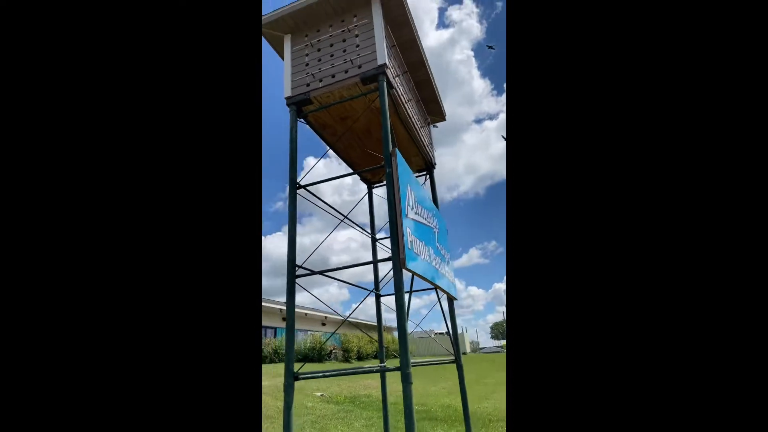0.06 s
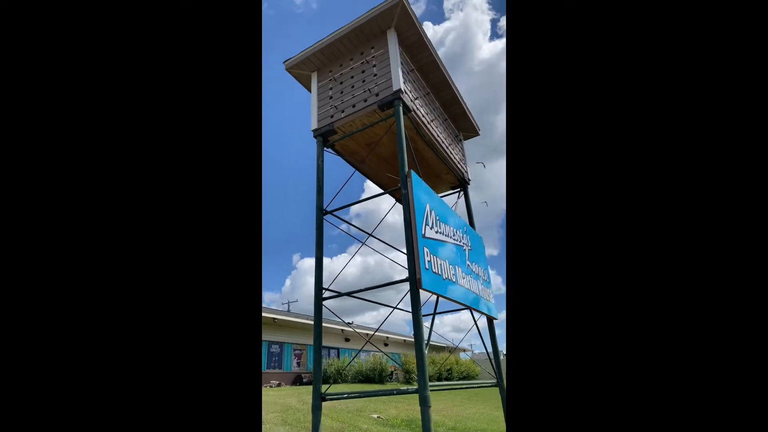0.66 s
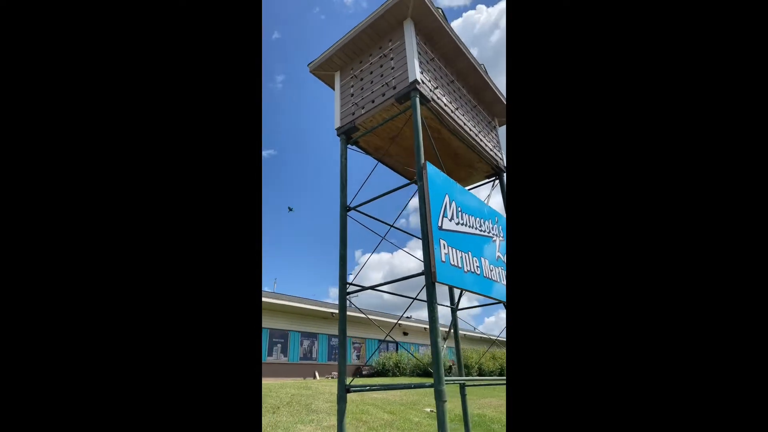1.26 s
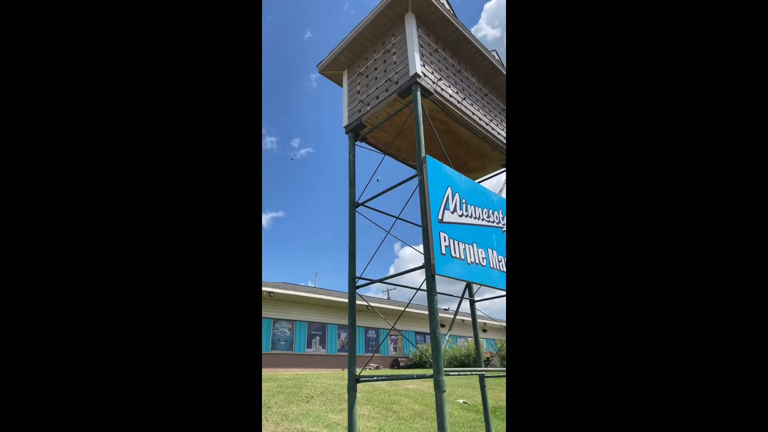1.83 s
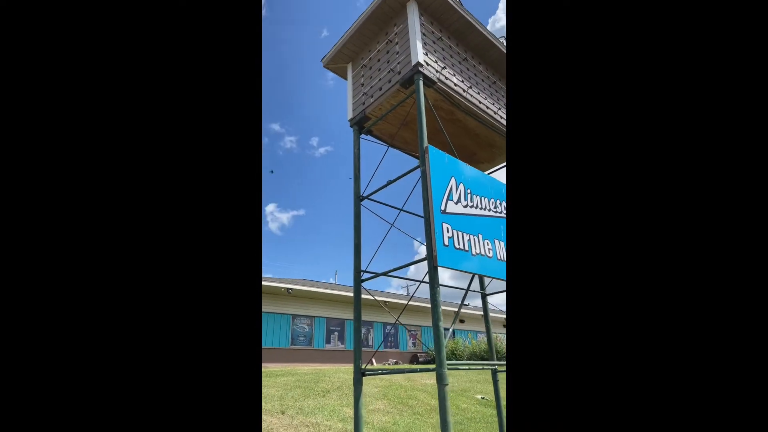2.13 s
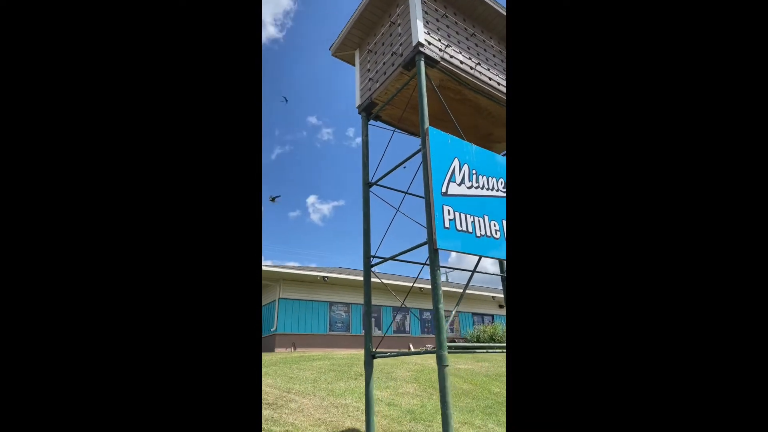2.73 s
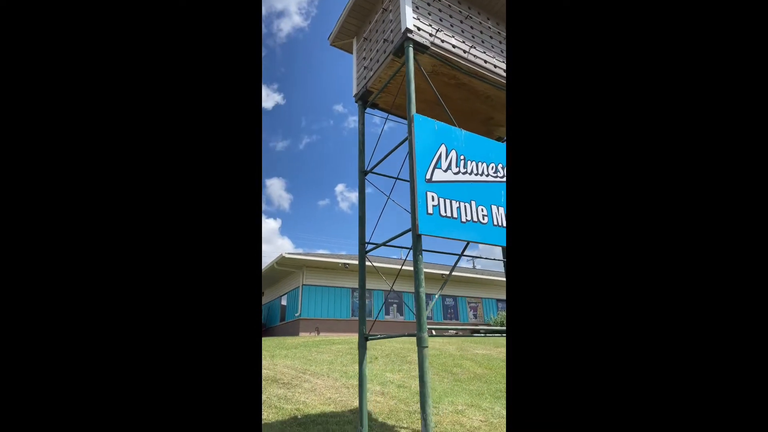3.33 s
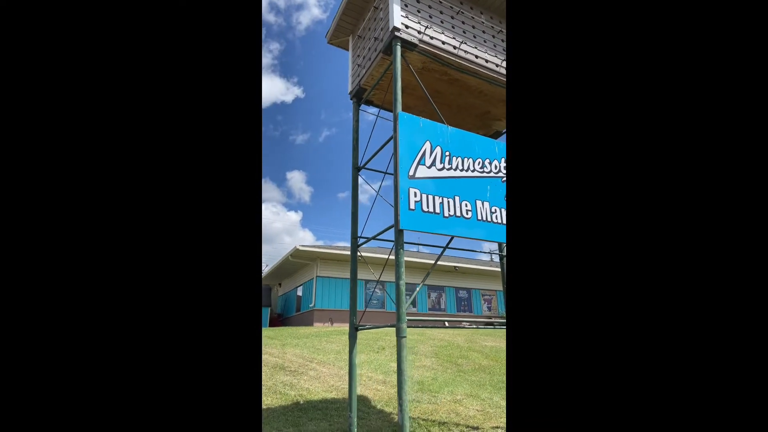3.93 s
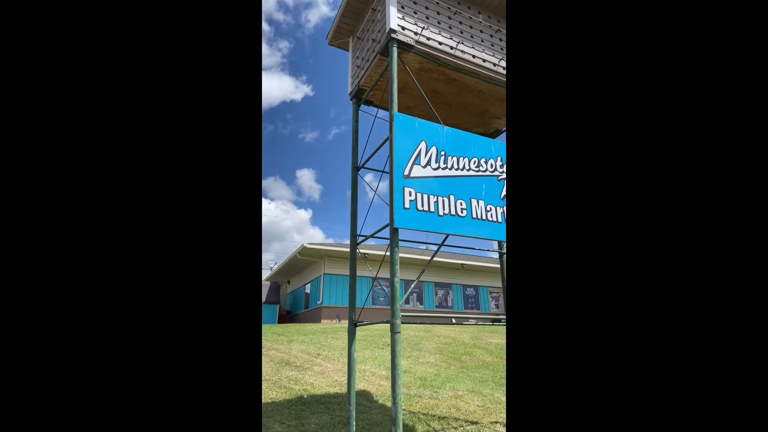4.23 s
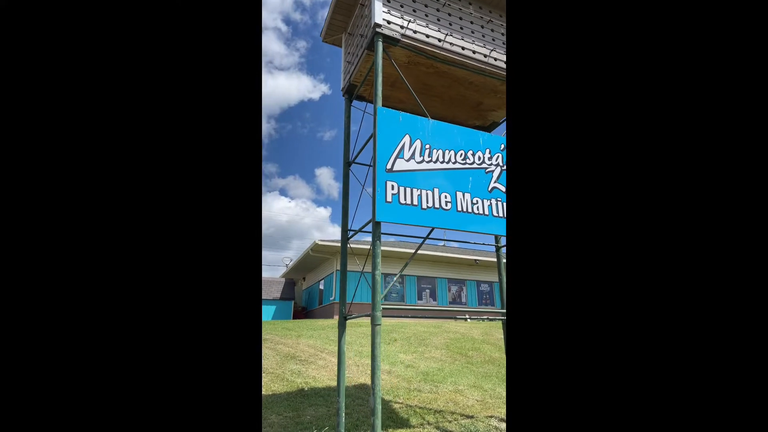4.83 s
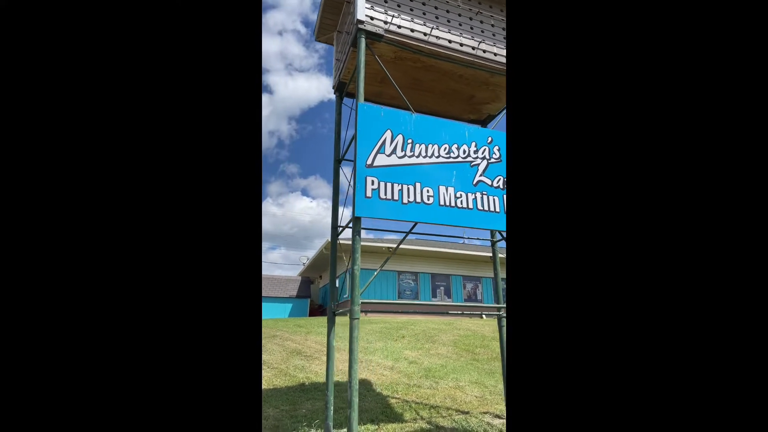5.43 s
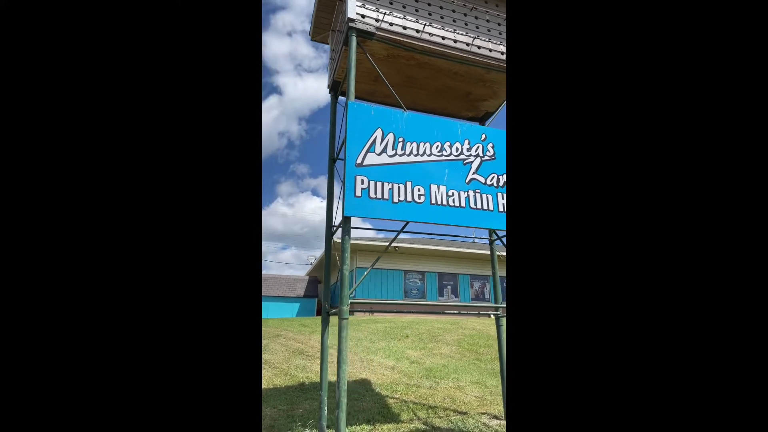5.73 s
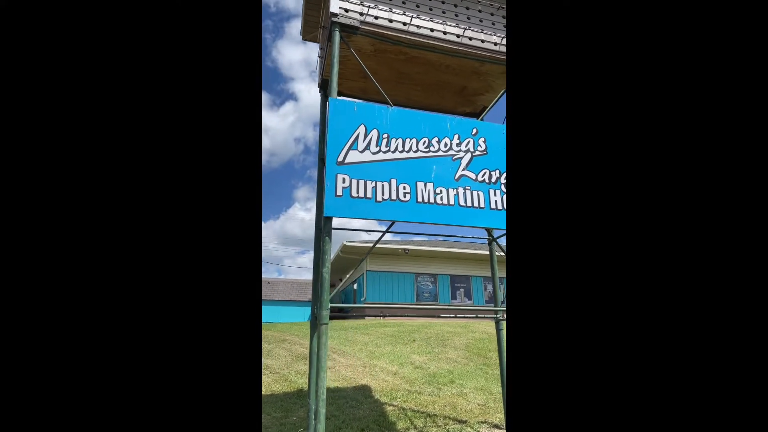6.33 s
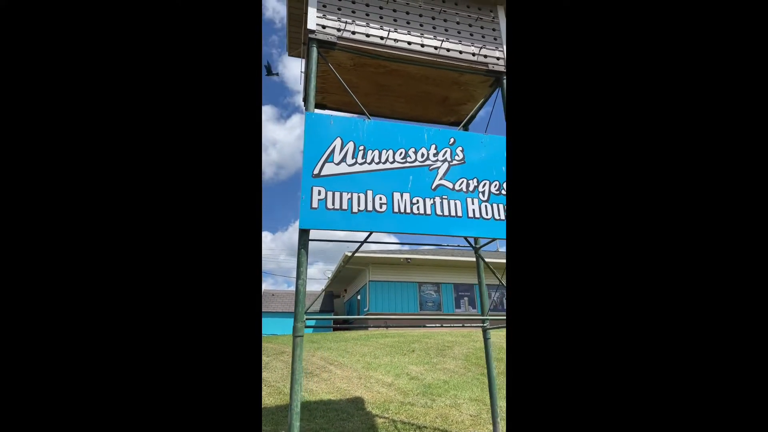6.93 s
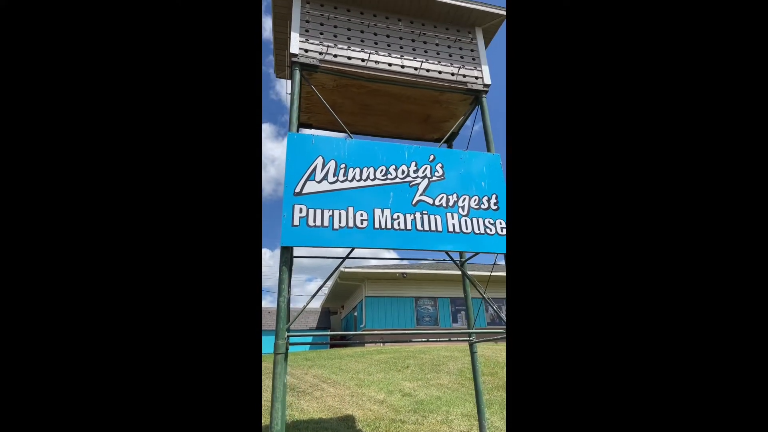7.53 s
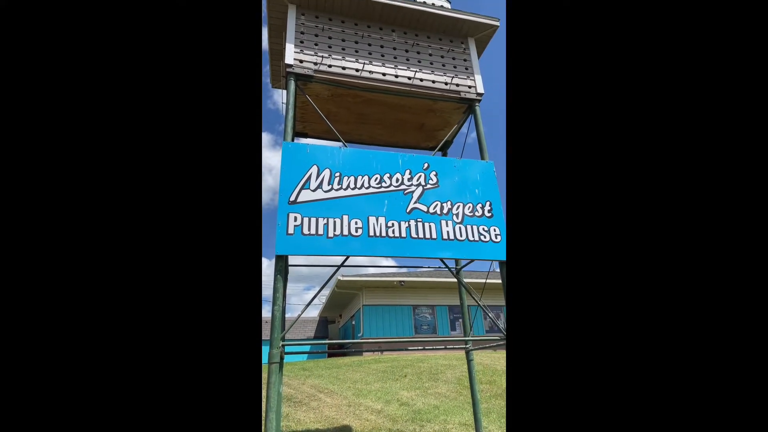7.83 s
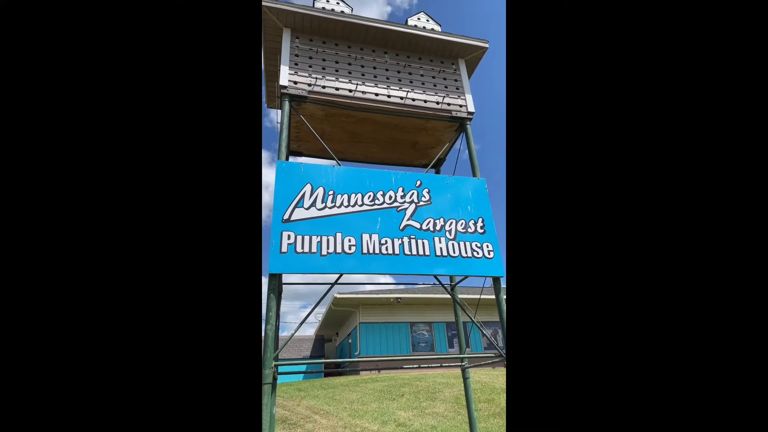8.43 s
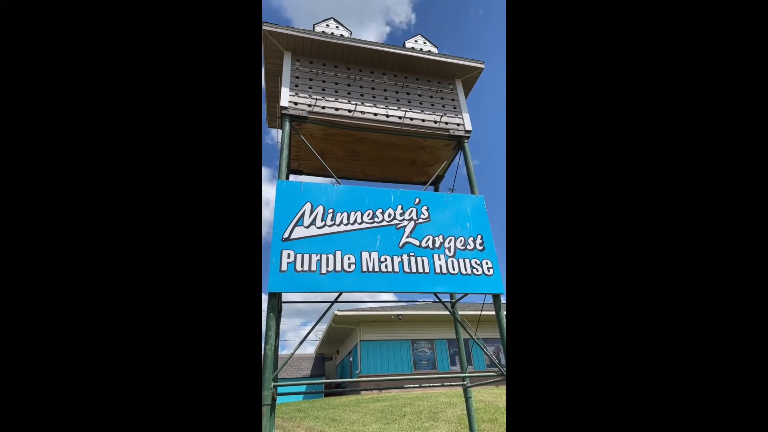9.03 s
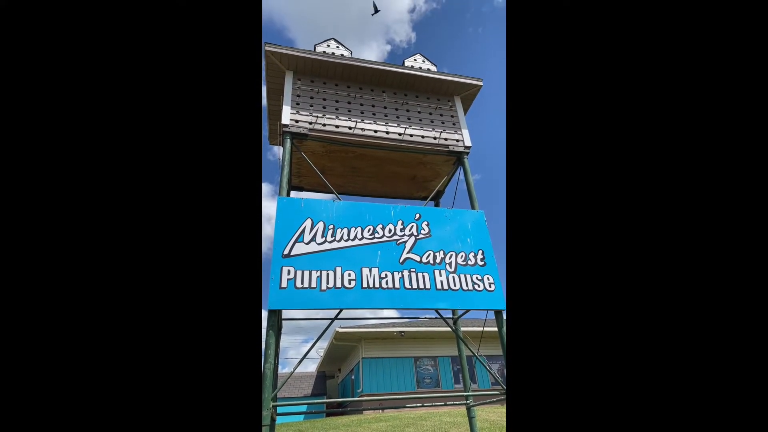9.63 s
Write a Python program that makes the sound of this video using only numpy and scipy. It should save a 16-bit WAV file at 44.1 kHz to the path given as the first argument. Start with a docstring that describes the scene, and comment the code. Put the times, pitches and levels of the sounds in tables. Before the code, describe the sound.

Purple martins chirp buzzy, down-slurred calls near and far over low traffic rumble, with wind gusts thumping the microphone later on.

```python
"""Purple martins around their colony house, near and far, throw down-slurred, buzzy "chew" calls,
each a sliding whistle with a fast trill. Near birds are fairly dry; far ones carry the yard's echo.
A car passes about nine metres off on the right and recedes, a heavy engine drones over a farther
road, and leaves hiss softly. Gusts thump on the hand-held stereo microphone, hardest near seven seconds."""
import sys
import numpy as np
from scipy import signal
from scipy.fft import rfft, irfft, next_fast_len
from scipy.io import wavfile
from scipy.ndimage import uniform_filter1d, map_coordinates

SR = 44100
rng = np.random.default_rng(int(sys.argv[2]) if len(sys.argv) > 2 else 0)


def unload_wav(signal):
    """Save mono or channel-first audio to the path in sys.argv[1] as 16-bit WAV at rate SR, clipped to [-1, 1]."""
    wavfile.write(
        sys.argv[1],
        SR,
        np.round(np.clip(np.atleast_2d(signal).T, -1, 1) * 32767).astype(np.int16),
    )


N = 426447

# Tyre roar from the road. Each row: frequency in Hz, relative level in dB.
TYRE_SPECTRUM = [(180, -11), (300, -19), (420, -13.5), (560, -5.5), (740, -0.5), (950, -0.5), (1120, -1.5),
                 (1480, -4), (2080, -11), (2800, -17.5), (3600, -26), (6000, -65)]
# Wind buffeting the microphone. Each row: frequency in Hz, relative level in dB.
BUFFET_SPECTRUM = [(24, -35), (40, -5), (70, 6.5), (120, -3.5), (200, -10.5), (320, -28), (700, -29),
                   (2000, -76)]
# The colour of a martin's overtones. Each row: frequency in Hz, gain in dB.
BEAK_RESPONSE = [(2600, 3), (3600, -16), (5200, 1.5), (6200, -1), (7400, 0), (8500, 1), (10700, -4),
                 (13000, -8)]


def amp(db):
    """Decibels to gain."""
    return 10 ** (np.asarray(db) / 20)


def unit(x):
    """Scale to rms 1."""
    return x / np.sqrt(np.mean(x ** 2) + 1e-20)


def along(points, hz):
    """Interpolate (Hz, value) points on a log frequency axis."""
    f, v = np.transpose(points)
    return np.interp(np.log(hz + 1), np.log(f + 1), v)


def curves(rows):
    """One value per sample for each column after the time."""
    s, *cols = np.transpose(rows)
    return [np.interp(np.arange(N) / SR, s, c) for c in cols]


def wobble(rate, size=N):
    """A smooth random curve, rate knots a second."""
    knots = rng.standard_normal(int(size * rate / SR) + 4)
    return map_coordinates(knots, [np.arange(size) * rate / SR])


def cycles(hz):
    """Running phase of a moving frequency, in radians."""
    return 2 * np.pi * (np.cumsum(hz) / SR + rng.random())


def filtered(x, response):
    """Filter x by a gain given as a function of frequency."""
    m = next_fast_len(N + SR // 4)
    return irfft(rfft(x, m) * response(np.fft.rfftfreq(m, 1 / SR)), m)[..., :N]


def add(track, s, sound):
    """Mix a sound into a track at time s."""
    start = int(np.clip(s * SR, 0, N - 1))
    track[..., start:start + sound.shape[-1]] += sound[..., :N - start]


def swell(u, attack, release):
    """Rounded start and end over the progress u of a call."""
    onset = np.sin(np.pi / 2 * np.clip(u / attack, 0, 1))
    return onset * np.sin(np.pi / 2 * np.clip((1 - u) / release, 0, 1))


def held(s, hold_s, db, rise_db_per_s, fall_db_per_s):
    """Gain that rises to db at time s, holds and dies away."""
    t = np.arange(N) / SR - s
    return amp(db - rise_db_per_s * np.maximum(-t, 0) - fall_db_per_s * np.maximum(t - hold_s, 0))


def rush(spectrum, patchy_db):
    """Stereo noise of rms 1 with patches of random gain, near mono in the bass."""
    # How alike the two channels are. Each row: frequency in Hz, left-right correlation.
    likeness = [(60, 1), (130, 0.98), (270, 0.85), (580, 0.39), (1240, 0.43), (2640, 0.53), (5600, 0.36),
                (11000, -0.17)]
    bins = signal.stft(rng.standard_normal((2, N)), nperseg=512)[2]
    patches = uniform_filter1d(rng.standard_normal(bins.shape[1:]), size=4, axis=0)
    patches = uniform_filter1d(patches, size=22, axis=1)
    pair = signal.istft(bins * amp(patchy_db * unit(patches)), nperseg=512)[1][:, :N]

    def mid_side_gains(hz):
        turn = np.arccos(np.clip(along(likeness, hz), -1, 1)) / 2
        band = (hz < 2 * spectrum[-1][0]) * np.minimum(hz / spectrum[0][0], 1) ** 4
        return band * amp(along(spectrum, hz)) * np.array([np.cos(turn), np.sin(turn)])

    mid, side = filtered(pair, mid_side_gains)
    return unit(np.array([mid + side, mid - side]))


def drone(hz, db, waver_db=1.5, spread_rad=.031):
    """One slightly unsteady hum line, reaching the two microphone ports a little apart."""
    apart = spread_rad * wobble(2.1) * np.array([[1], [-1]])
    level = amp(db + waver_db * wobble(4))
    return np.sqrt(2) * level * np.sin(cycles(hz + .27 * wobble(3.02)) + apart)


def leaves(level_db=-46.5):
    """Leaves hiss softly in the breeze."""
    # Leaf hiss. Each row: frequency in Hz, relative level in dB.
    hiss_spectrum = [(900, -21), (2000, 12.5), (3000, 6), (4200, 4), (4900, -3), (6200, -3), (8000, -9.5),
                     (10700, -4), (12500, -15.5)]
    return amp(level_db) * rush(hiss_spectrum, patchy_db=2)


def far_road():
    """Rumble and tyre roar of traffic on a farther road."""
    # Traffic levels. Each row: time in seconds, then deep rumble, upper rumble and tyre roar in dB.
    levels = [(0, -30, -39, -46), (1.5, -33, -38, -38.5), (2.6, -28, -40.5, -41.5),
              (3.5, -35.5, -41.5, -43), (6.2, -32, -40, -39.5), (7.1, -43, -40.5, -42),
              (8, -43, -40, -41.5), (9.67, -42.5, -42, -43.5)]
    # The two bands of rumble. Each row: frequency in Hz, relative level in dB.
    deep_spectrum = [(15, -50), (28, -30), (40, -6.5), (52, -1), (80, 0), (110, -5.5), (150, -15),
                     (260, -31.5)]
    upper_spectrum = [(70, -14), (130, 0), (180, -1.5), (260, -5), (380, -12), (600, -11), (1200, -50)]
    deep_db, upper_db, roar_db = curves(levels)
    deep = amp(deep_db) * rush(deep_spectrum, patchy_db=1.5)
    upper = amp(upper_db) * rush(upper_spectrum, patchy_db=1.5)
    return deep + upper + amp(roar_db) * rush(TYRE_SPECTRUM, patchy_db=1.75)


def machine(hz=185):
    """A faint machine hum that comes through late."""
    # The hum's rise. Each row: time in seconds, level in dB.
    levels = [(5.6, -53), (6.3, -45.5)]
    return drone(hz, *curves(levels))


def heavy_engine(low_hz=60.94, high_hz=91.8, rise_hz_per_s=.45):
    """A heavy engine in the background hums on two lines, the low one creeping up in pitch."""
    # The engine's two lines. Each row: time in seconds, low hum in dB, high hum in dB.
    levels = [(0, -25, -33), (1.7, -29, -28.5), (3.2, -30.5, -43), (4.4, -32.5, -33.5), (5.6, -39.5, -33),
              (6.6, -52, -38), (7.3, -44, -48.5), (9.67, -52, -45.5)]
    low_db, high_db = curves(levels)
    return drone(low_hz + rise_hz_per_s * np.arange(N) / SR, low_db) + drone(high_hz, high_db)


def car(nearest_s=.353, nearest_m=9.45, speed_m_per_s=14, grass_db_per_m=.04):
    """A car passes on the right, fading with distance over the grass, its exhaust note dropping."""
    # Tyre hiss. Each row: frequency in Hz, relative level in dB.
    hiss_spectrum = [(900, -17), (2000, 9), (3200, 5), (4900, -0.5), (6200, 0), (8000, -6), (10700, -9),
                     (12500, -19)]
    roar_db, hiss_db, pan_db = -27.5, -39.5, -4.5
    exhaust_hz, sag_hz_per_s = 137.5, 3
    t = np.arange(N) / SR
    past_m = speed_m_per_s * (t - nearest_s)
    range_m = np.hypot(nearest_m, past_m)
    leaving = past_m / range_m
    gain = nearest_m / range_m * amp(-grass_db_per_m * (range_m - nearest_m))
    doppler = 1 / (1 + leaving * speed_m_per_s / 343)
    facing = (1 + leaving) / 2  # the exhaust points backwards, so it opens up once the car is past
    exhaust = facing * drone(doppler * (exhaust_hz - sag_hz_per_s * t), db=-30)
    roar = amp([[roar_db + pan_db / 2], [roar_db - pan_db / 2]]) * rush(TYRE_SPECTRUM, patchy_db=1)
    hiss = amp(hiss_db) * rush(hiss_spectrum, patchy_db=2)
    return gain * (exhaust + roar + hiss)


def crosswind(edge_hz=80, breeze_db=-55):
    """One slow side gust, over a light breeze, pushes the two microphone ports in opposite directions."""
    buffet = rush(BUFFET_SPECTRUM, patchy_db=5)[0]
    # the largest eddies cover both ports, so the deep bass drops out
    eddies = filtered(buffet, lambda hz: hz ** 2 / (hz ** 2 + edge_hz ** 2))
    gust = held(s=5.9, hold_s=.13, db=-31, rise_db_per_s=28, fall_db_per_s=28)
    return (amp(breeze_db) + gust) * unit(eddies) * np.array([[1], [-1]])


def gusts():
    """Gusts buffet the microphone, and their biggest eddies land as single thumps."""
    # Single eddies. Each row: moment of the peak in seconds, pitch in Hz, peak level in dB.
    eddies = [(6.736, 228, -18), (6.742, 85, -13.5), (6.782, 383, -18), (6.794, 110, -13),
              (6.842, 176, -16), (7.005, 217, -18), (7.112, 94, -17.5), (8.343, 177, -24),
              (9.496, 55.6, -21)]
    # Gusts. Each row: moment of full strength in seconds, hold in seconds, level in dB.
    blasts = [(6.656, .24, -23), (6.964, 0.058, -20), (8.196, .36, -40.5), (9.24, 0.41, -34)]
    thumps = np.zeros(N)
    for s, hz, db in eddies:
        turns = np.arange(-2 * SR / hz, 2 * SR / hz) * hz / SR
        add(thumps, s - 2 / hz, amp(db) * np.cos(2 * np.pi * turns) * np.exp(-2 * turns ** 2))
    strength = np.max([held(*blast, rise_db_per_s=190, fall_db_per_s=198) for blast in blasts], axis=0)
    return thumps + strength * rush(BUFFET_SPECTRUM, patchy_db=0)


def yard(x):
    """Buildings and trees scatter a short tail back to the microphone."""
    # The yard's decay. Each row: frequency in Hz, time to fall 60 dB in seconds.
    decay_times = [(500, 0.8), (3000, 0.2), (10000, 0.16)]
    hz, t, bins = signal.stft(rng.standard_normal((2, SR // 2)), SR, nperseg=256)
    tail = signal.istft(bins * amp(-60 * t / along(decay_times, hz)[:, None]), SR, nperseg=256)[1]
    return signal.fftconvolve(x, tail / np.linalg.norm(tail[0]), axes=1)[:, :N]


def bounced(voice, strength=.16, count=5):
    """The house and the ground throw back weak copies within milliseconds."""
    heard = np.zeros((2, voice.shape[1] + SR // 40))
    add(heard, 0, voice)
    for delay_s in rng.uniform(.002, .02, count):
        add(heard, delay_s, strength * voice)
    return heard


def rasps(rough_db=1.5):
    """Bouts of hoarse, toneless chatter in the distance."""
    # The bouts. Each row: start in seconds, length in seconds, level in dB.
    bouts = [(7.74, 0.27, -43.5), (8.284, 0.19, -41), (8.52, 0.23, -47), (8.957, 0.41, -37.5)]
    # Their hoarse colour. Each row: frequency in Hz, relative level in dB.
    rasp_spectrum = [(1200, -29), (1650, 9.5), (1950, 0.5), (2220, 12), (2450, 3), (2800, -12),
                     (3500, -1.5), (4300, -16), (5200, -44), (9000, -54)]
    level = np.zeros(N)
    for s, length, db in bouts:
        add(level, s, amp(db) * np.sin(np.linspace(0, np.pi, int(length * SR))))
    return level * amp(rough_db * wobble(70)) * rush(rasp_spectrum, patchy_db=2)


def whistles(waver=.011):
    """Thin, high notes far off glide evenly from one pitch to another."""
    # The notes. Each row: start and length in seconds, first and last pitch in Hz, peak level in dB.
    notes = [(3.619, .11, 5530, 5780, -48), (4.764, 0.092, 8450, 8000, -47.5)]
    track = np.zeros(N)
    for s, length, start_hz, end_hz, db in notes:
        u = np.linspace(0, 1, int(length * SR))
        hz = (start_hz + (end_hz - start_hz) * u) * (1 + waver * wobble(154, len(u)))
        add(track, s, amp(db) * swell(u, attack=.4, release=.4) * np.sin(cycles(hz)))
    return track


def syrinx(pitch, depth_hz, rough):
    """Stereo phase and level flutter of a bird's voice trilled about 140 times a second."""
    size = len(pitch)
    trill = cycles(rng.uniform(125, 155) * (1 + .07 * wobble(50, size)))
    phase = cycles(pitch + depth_hz * (np.sin(trill) + .2 * wobble(350, size)))
    flutter = amp(rough * (4 * np.cos(trill + 1) + 2.5 * wobble(110, size)))
    lead_s = rng.normal(2.5e-5, 1e-5)  # the sound reaches one microphone port before the other
    return phase + np.pi * pitch * lead_s * np.array([[1], [-1]]), flutter


def scratch(length, hz, droop=.0664):
    """A forced call, nearly level in pitch, with a rough stack of overtones."""
    u = np.linspace(0, 1, int(length * SR))
    pitch = hz * (1 - droop * (2 * u - .8) ** 2 + .018 * wobble(700, len(u)))
    phase, flutter = syrinx(pitch, depth_hz=90, rough=1)
    stack = sum(amp(along(BEAK_RESPONSE, k * hz)) * np.sin(k * phase) for k in range(1, 5))
    return unit(stack * flutter * swell(u, attack=.14, release=.13))


def chew(length, top_hz, end_hz, overtone_db, burr=1, scoop=.0902, fade_db=3):
    """One martin call: the pitch arches, slides down and trails off, growing rougher as it falls."""
    # Low calls burr deeply, high ones are purer. Each row: top pitch in Hz, usual pitch swing in Hz.
    burr_depths = [(3500, 172), (4300, 145)]
    tail_share, tail_db, tail_slope = .33, -13.5, .6  # a faint tail slides on after the call
    u = np.arange(int((1 + tail_share) * length * SR)) / (length * SR)
    crest = np.interp(length, [.06, .16], [.2, .28])
    before_crest = np.clip(1 - u / crest, 0, 1)
    after_crest = np.clip((u - crest) / (1 - crest), 0, 1)
    dip = scoop * min(length / .16, 1) * before_crest ** 2  # short calls skip most of the opening rise
    slide = (np.sin(1.3 * after_crest) / np.sin(1.3)) ** 1.7
    trail = tail_slope * np.maximum(u - 1, 0)
    pitch = top_hz * (1 - dip) - (top_hz - end_hz) * (slide + trail)
    depth_hz = burr * along(burr_depths, top_hz) * rng.uniform(.85, 1.25)
    phase, flutter = syrinx(pitch, depth_hz, rough=.5 + .45 * np.minimum(u, 1))
    body = swell(u, attack=.42, release=.34)
    tail = amp(tail_db) * swell(u / (1 + tail_share), attack=.7, release=.25)
    loudness = unit((body + tail) * flutter * amp(-fade_db * u)) / np.sqrt(1 + tail_share)
    second = amp(along(BEAK_RESPONSE, 2 * pitch)) * np.sin(2 * phase)
    third = amp(along(BEAK_RESPONSE, 3 * pitch) + 1) * np.sin(3 * phase)
    overtones = amp(overtone_db) * np.abs(1 - slide) ** 1.5 * (second + third)  # fade down the slide
    return np.sqrt(2) * loudness * (np.sin(phase) + overtones)


def far_flock(count=110, pitch_hz=3450, trim_db=-5):
    """Farther martins make the same call at random moments and blur into chatter."""
    # The flock's swell and fade. Each row: time in seconds, relative call level in dB.
    levels = [(0, -58), (2, -47), (3.3, -47), (5, -46.5), (6.6, -58), (9.6, -69)]
    track = np.zeros((2, N))
    starts = rng.uniform(0, N / SR, count)
    for s, (long, high, loud, side) in zip(starts, rng.standard_normal((count, 4))):
        top_hz = pitch_hz * np.exp(.1 * high)
        db = np.interp(s, *np.transpose(levels)) + trim_db + 2 * loud
        call = chew(.13 * np.exp(.2 * long), top_hz, .8 * top_hz, overtone_db=-17, burr=.73)
        add(track, s, amp([[db + side], [db - side]]) * call)
    return track


def near_martins(usual_hz=3500, usual_db=-42, slide_per_s=2.3, fall_per_db=.036):
    """The birds around the house; high calls linger on the crest, and louder ones fall further."""
    # The "chew" calls. Each row: start and length in seconds, top pitch in Hz,
    # then level, relative overtone level and left over right in dB.
    chews = [ (.053, .16, 3130, -40.5, -20, -6), (0.103, .11, 4000, -38.5, -25, 2),
             (.19, .09, 3930, -43, -24, 2), (.36, .14, 3750, -39, -28, 0), (.46, .1, 3620, -43.5, -25, 1),
             (0.656, 0.067, 3620, -45, -21, 2), (1.052, .14, 3640, -47, -20, -2),
             (1.66, 0.18, 3300, -46, -23, 0), (1.787, 0.16, 3670, -40, -17, -1),
             (1.948, 0.12, 4280, -39.5, -20, 4), (2.109, .17, 3350, -46.5, -27, -7),
             (2.222, 0.1, 4130, -37, -24, 0), (2.441, 0.067, 3295, -40, -12.5, -5),
             (2.498, 0.078, 4150, -43, -15, 0), (2.687, .17, 3290, -41.5, -21, 1),
             (2.769, .063, 4600, -41, -20, 0), (2.794, 0.068, 3590, -35.5, -21, -4),
             (2.935, 0.13, 4140, -38.5, -24, 2), (2.974, 0.13, 3390, -45, -23, 0),
             (3.172, 0.15, 3820, -42, -20, 0), (3.223, 0.17, 4190, -45.5, -18, 1),
             (3.499, .15, 3620, -47, -26, 4), (3.611, .11, 3350, -47, -25, -1),
             (3.796, .09, 3200, -49, -27, 7), (4.114, .1, 3800, -41.5, -19, 5),
             (4.178, .12, 3200, -45.5, -19, -8), (4.358, 0.068, 4450, -48, -25, 7),
             (4.38, 0.23, 3300, -47.5, -23, 4), (4.47, 0.095, 4400, -49.5, -16, -2),
             (4.677, 0.16, 3600, -44, -26, 1), (4.782, .09, 4200, -52, -20, 2),
             (5.037, .18, 3610, -30.5, -14.5, .5), (5.156, 0.086, 3980, -44.5, -16, 1),
             (5.399, 0.21, 3270, -47, -27, 1), (5.822, .16, 3870, -40, -26, 2),
             (5.849, .17, 2800, -45.5, -18, 6), (6.064, .17, 3674, -35.5, -25, 0),
             (6.149, .19, 2840, -44.5, -13, 9), (6.405, .16, 3480, -40, -23, 0),
             (6.758, .14, 2970, -37.5, -29, 0), (7.465, 0.096, 3210, -47.5, -25, 0),
             (7.661, 0.17, 3000, -44, -27, 2), (8.123, .15, 2920, -43.5, -34, 2.5),
             (8.574, 0.13, 3200, -50, -29, -3), (8.822, .2, 3200, -44.5, -33, -0.5),
             (9.267, 0.072, 4650, -42, -16, 7), (9.287, 0.065, 3710, -37.5, -7, -2),
             (9.435, 0.15, 4320, -35.5, -21, 2)]
    # Harsh, scratchy calls. Each row: start and length in seconds, pitch in Hz, level in dB.
    scratches = [(2.781, 0.062, 3530, -52), (5.15, 0.072, 3600, -56), (6.129, 0.11, 2620, -45.5),
                 (6.275, 0.09, 2460, -56), (9.27, 0.082, 3510, -50)]
    linger_above_hz, linger_s_per_hz = 3250, 4.2e-5
    track = np.zeros((2, N))
    for s, length, top_hz, db, overtone_db, pan_db in chews:
        linger_s = linger_s_per_hz * max(top_hz - linger_above_hz, 0)
        sliding_s = max(length - linger_s, length / 3)
        full_fall = .24 * (top_hz / usual_hz) ** .695  # higher calls have more room to fall
        fall = min(slide_per_s * sliding_s, full_fall) * (1 + fall_per_db * (db - usual_db))
        call = chew(length, top_hz, top_hz * (1 - fall), overtone_db)
        add(track, s, amp([[db + pan_db / 2], [db - pan_db / 2]]) * bounced(call))
    for s, length, hz, db in scratches:
        add(track, s, amp(db) * bounced(scratch(length, hz)))
    return track


def scene(near_wet_db=-13, far_wet_db=-2):
    """From the yard: near birds fairly dry, far ones wet, with traffic and wind under them."""
    near, far = near_martins(), far_flock() + whistles()
    echo = yard(amp(near_wet_db) * near + amp(far_wet_db) * far)
    birds = near + far + echo + rasps()
    motors = car() + heavy_engine() + machine() + far_road()
    wind = leaves() + gusts() + crosswind()
    return birds + motors + wind


def record(dry):
    """Overall tone colour of mid and side, with a deep mid hole near 9 kHz and nothing above 12.5 kHz."""
    # Tone colour of the mid and of the side signal. Each row: frequency in Hz, gain in dB.
    mid_colour = [(20, 0.5), (7900, -1.5), (8350, -11), (8800, -67), (9300, -41), (9800, -1.5), (10700, 6),
                  (11500, 6), (12400, -13)]
    side_colour = [(1300, -2), (1800, -9.5), (2900, 6), (4000, 1), (5000, 8), (6200, -12), (7500, 2),
                   (9500, 3), (10700, 7.5), (12000, -14)]
    limit_hz = 12500
    mid = filtered((dry[0] + dry[1]) / 2, lambda hz: amp(along(mid_colour, hz)) * (hz < limit_hz))
    side = filtered((dry[0] - dry[1]) / 2, lambda hz: amp(along(side_colour, hz)) * (hz < limit_hz))
    return np.array([mid + side, mid - side])


dry = scene()
out = record(dry)
unload_wav(out)
```